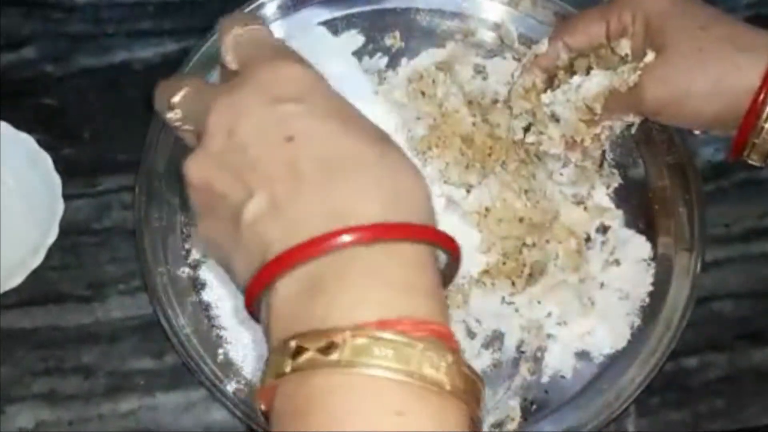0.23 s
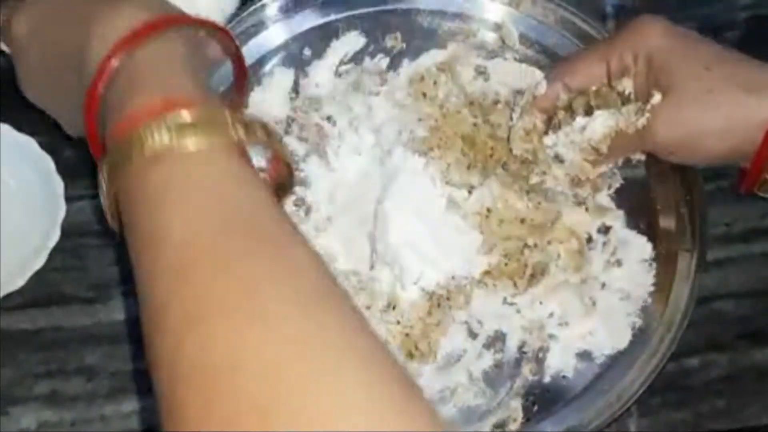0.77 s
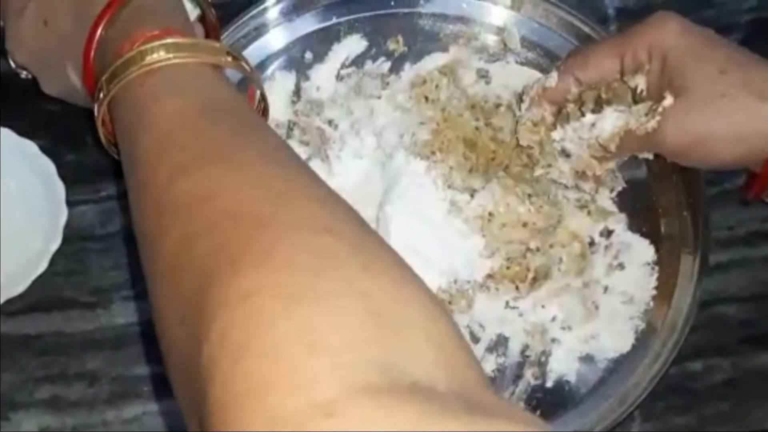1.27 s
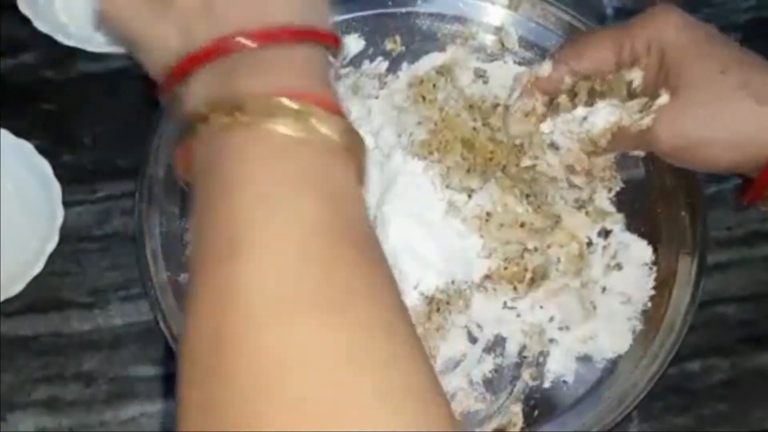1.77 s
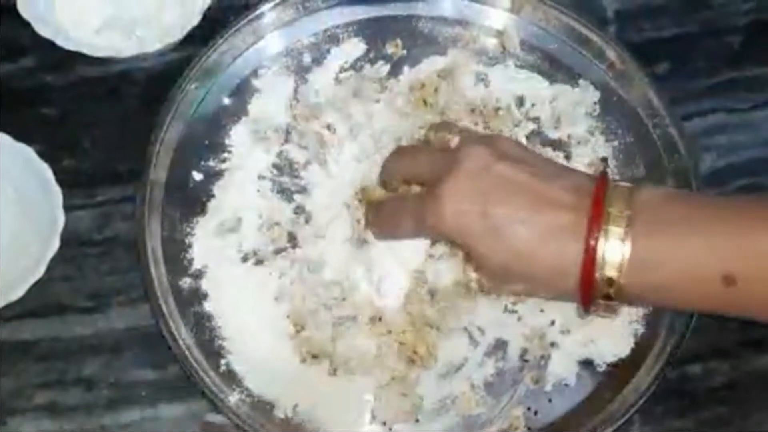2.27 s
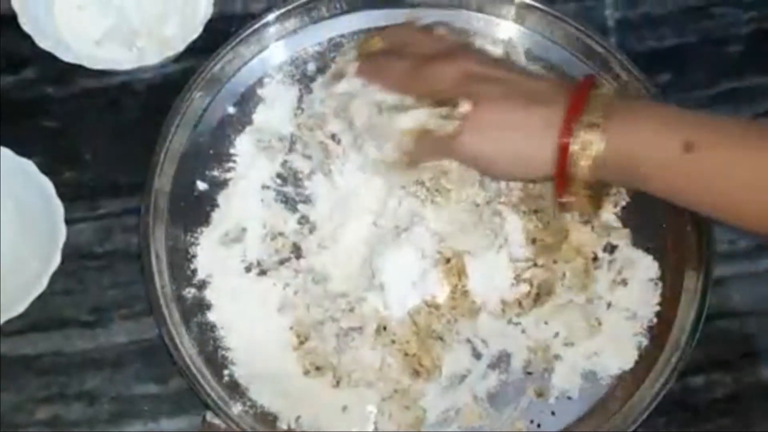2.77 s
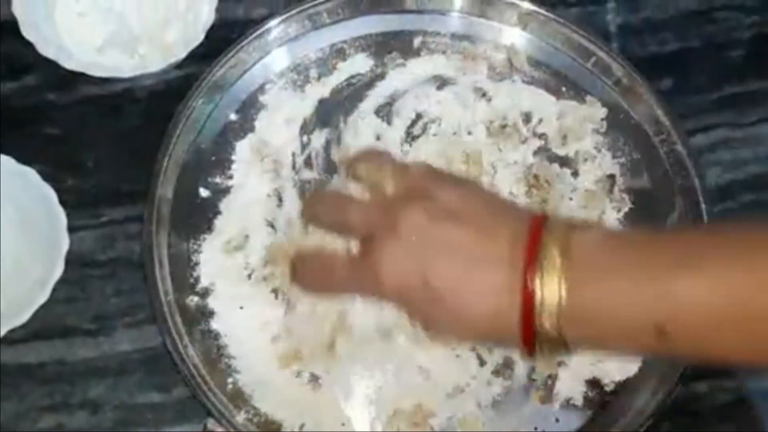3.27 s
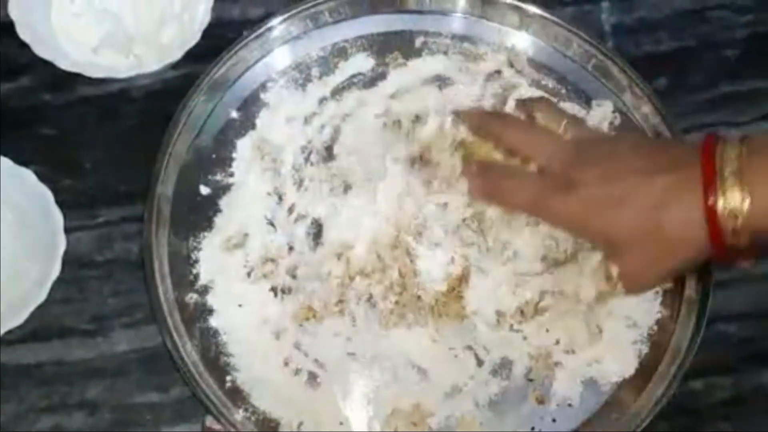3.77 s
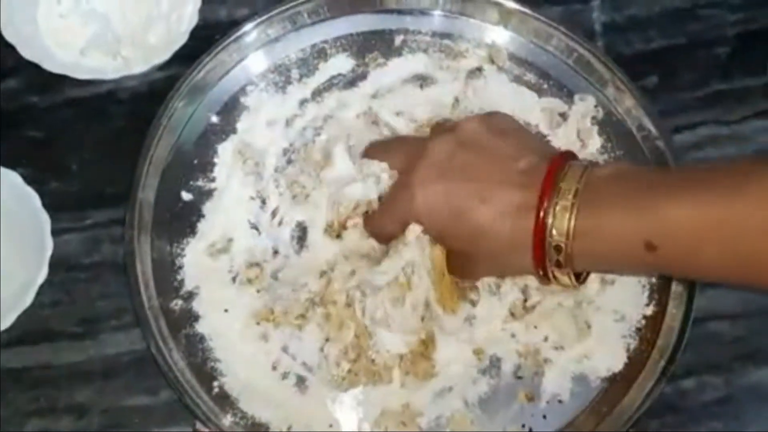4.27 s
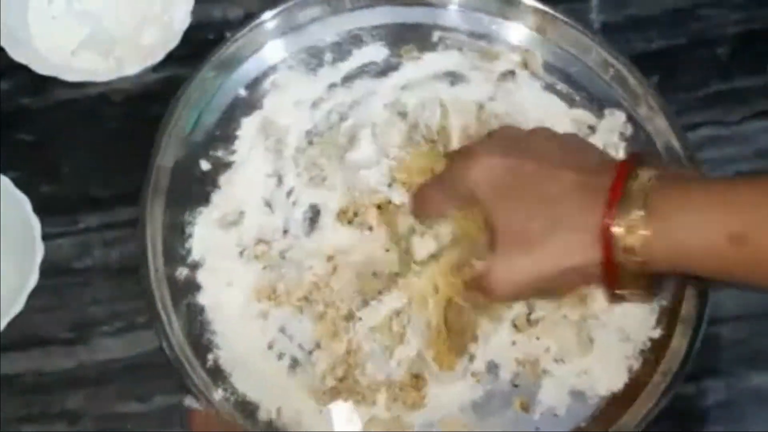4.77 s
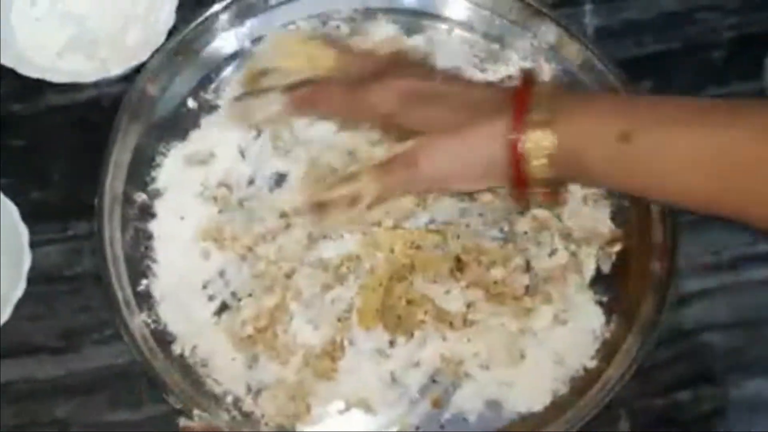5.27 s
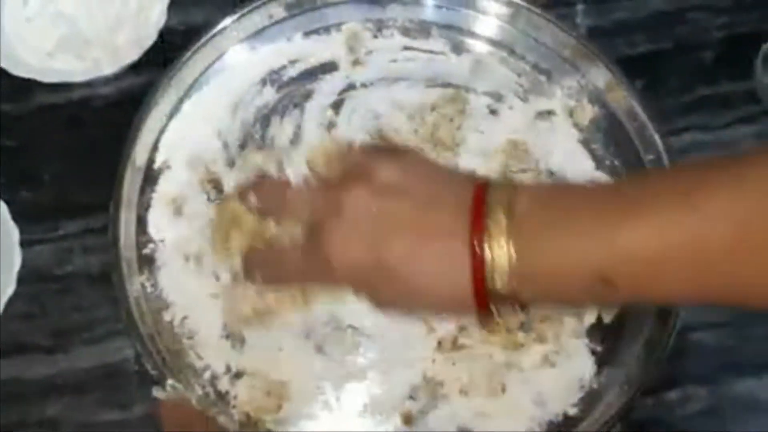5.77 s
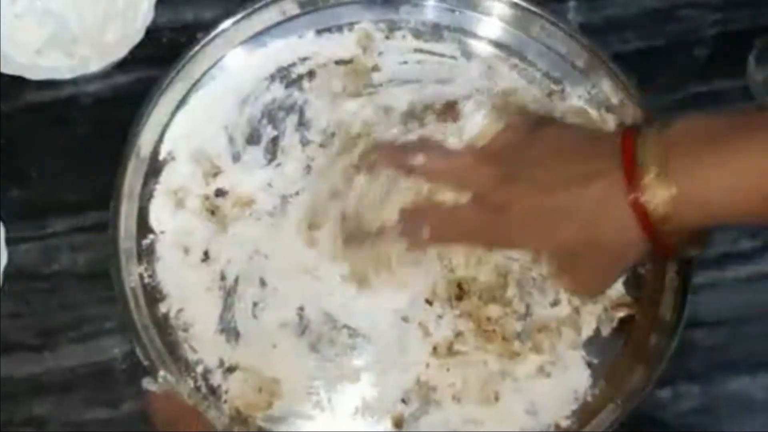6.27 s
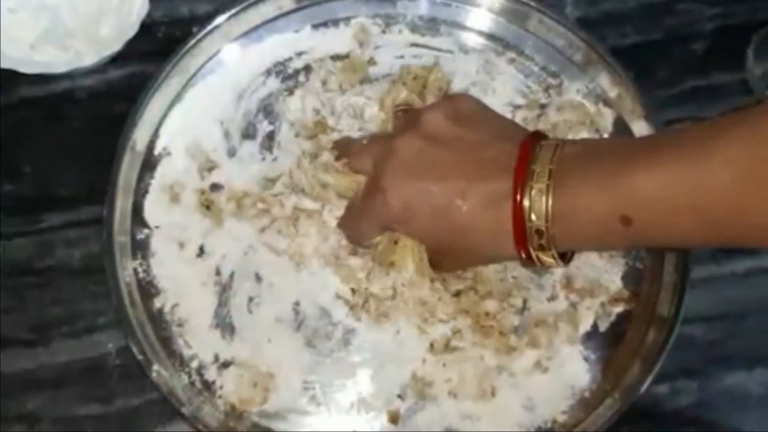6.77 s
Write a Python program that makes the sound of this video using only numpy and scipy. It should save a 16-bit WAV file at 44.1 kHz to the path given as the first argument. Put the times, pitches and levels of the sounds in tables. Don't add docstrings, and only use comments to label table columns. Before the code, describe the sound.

Recorded by a phone within an arm's length of a bowl on a stone counter. Quiet low rumble opens, two short dish knocks follow, then light bangle clinks. Dry, grainy rubbing starts softly and grows into uneven scratchy sweeps with dull steel resonance and scraping underneath. Around the middle a sharp bright clang on the bowl rim stands far above everything, with a weak rebound; rubbing continues with tiny ticks and a delicate glassy tinkle.

```python
import sys
import numpy as np
from scipy import signal
from scipy.fft import rfft, irfft
from scipy.io import wavfile
from scipy.ndimage import uniform_filter1d

SR = 44100
rng = np.random.default_rng(int(sys.argv[2]) if len(sys.argv) > 2 else 0)


def amplitude_ratio(level_db):
    exponent = np.asarray(level_db, float) / 20
    return 10 ** exponent


def to_wav(s):
    ch = np.atleast_2d(s).T
    pcm = np.round(np.clip(ch, -1, 1) * 32767)
    wavfile.write(sys.argv[1], SR, pcm.astype(np.int16))


N = 309435
LEFT_LATE = 4
FRAME = 1024
HZ = np.fft.rfftfreq(FRAME, 1 / SR)[:, None]

# f/Hz, left-right/dB
BOWL_LEAN = [(300, -1), (700, 3), (1500, -9), (2500, -7), (5000, -1), (12000, -1.5)]


def read(points, hz):
    f, value = np.transpose(points)
    return np.interp(np.log(hz + 1), np.log(f + 1), value)


def evened(x):
    return x / np.sqrt(np.mean(abs(x) ** 2) + 1e-30)


def add(mix, s, sound):
    part = mix[:, round(s * SR):][:, :sound.shape[1]]
    part += sound[:, :part.shape[1]]


def patches(shape, bins, frames):
    z = uniform_filter1d(rng.standard_normal(shape), int(bins), 0)
    return evened(uniform_filter1d(z, int(frames), 1))


def ports(a, b, hz, same, lean):
    likeness = np.clip(read(same, hz), 0, 1)
    late = np.exp(-2j * np.pi * hz * LEFT_LATE / SR)
    side = amplitude_ratio(read(lean, hz) / 2)
    right = likeness * a + np.sqrt(1 - likeness ** 2) * b
    return np.array([a * late * side, right / side])


def room_tone():
    # f/Hz, level per Hz/dB
    colour = [(25, -25), (50, -12), (80, -1), (119, 5), (150, -6.5), (195, -21), (250, -8), (340, -18),
              (450, -26.5), (850, -34), (1400, -38.5), (2100, -36), (2900, -47.5), (15500, -49.5)]
    # t/s, level/dB
    swell = [(0.0, -67), (0.4, -65), (0.72, -61.5), (1.04, -70.5), (1.55, -62), (2.05, -65), (3.75, -69.5),
             (4.2, -63.5), (4.55, -68), (4.92, -61), (5.2, -63.5), (6.0, -66.5), (6.21, -61.5), (6.76, -60),
             (7.02, -61.5)]
    # f/Hz, left-right likeness/0-1
    same = [(60, 0.94), (130, 0.94), (290, 0.86), (640, 0.1), (1410, 0), (3100, 0.3), (6820, 0.3),
            (15000, 0.08)]
    # f/Hz, left-right/dB
    lean = [(60, -2), (500, -1), (1500, -5.5), (5000, -1.5), (15000, 2.5)]
    hz = np.fft.rfftfreq(2048, 1 / SR)[:, None]
    t = np.arange(N // 512 + 5) * 512 / SR
    shape = (2, len(hz), len(t))
    a, b = rng.standard_normal(shape) + 1j * rng.standard_normal(shape)
    swell_db = np.interp(t, *np.transpose(swell))
    follow = 1 / (1 + (hz / 220) ** 2)
    level_db = follow * swell_db + (1 - follow) * -62
    level_db = level_db + 2.0 * patches(a.shape, 3, 4.6) * (hz < 900)
    gain = amplitude_ratio(read(colour, hz))
    gain = gain / np.sqrt(np.sum(gain[:10] ** 2))
    z = ports(a, b, hz, same, lean) * gain * amplitude_ratio(level_db)
    return amplitude_ratio(6.5) * signal.istft(z, nperseg=2048, noverlap=1536)[1][:, :N]


def panned(x, pan_db):
    left, right = x * np.ones((2, 1))
    return np.array([np.roll(left, LEFT_LATE) * amplitude_ratio(pan_db / 2), right * amplitude_ratio(-pan_db / 2)])


def brushes():
    # t/s, length/s, start f/Hz, end f/Hz, width/Hz, level/dB
    sweeps = [(0.416, 0.12, 12300, 4980, 3300, -77), (0.38, 0.17, 690, 660, 29, -75.5),
              (0.69, 0.096, 1336, 1320, 90, -77.5), (0.99, 0.12, 9100, 9000, 500, -86),
              (1.511, 0.05, 6600, 5630, 2100, -74.5), (1.784, 0.051, 9000, 10040, 4600, -67.5),
              (4.596, 0.12, 935, 953, 26, -61), (4.639, 0.14, 1210, 1205, 43, -55.5),
              (6.145, 0.065, 940, 956, 21, -58.5), (6.424, 0.038, 1700, 1646, 250, -51),
              (6.558, 0.13, 4022, 3960, 8, -71), (6.703, .14, 4608, 4608, 8, -75),
              (0.722, 0.089, 1630, 1630, 25, -83)]
    out = np.zeros((2, N))
    for s, length, from_hz, to_hz, width_hz, db in sweeps:
        n = int(length * SR)
        pole = np.exp(-np.pi * width_hz / SR)
        fuzz = signal.lfilter([1], [1, -pole], rng.standard_normal((2, 8000)))[:, :n]
        turn = np.exp(2j * np.pi * np.cumsum(np.geomspace(from_hz, to_hz, n)) / SR)
        band = evened(((fuzz[0] + 1j * fuzz[1]) * turn).real)
        add(out, s, panned(amplitude_ratio(db) * band * np.hanning(n), -6.5))
    return out


def coloured(x, spectrum):
    gain_db = np.maximum(read(spectrum, abs(np.fft.fftfreq(8192, 1 / SR))), -90)
    log_gain = np.log(amplitude_ratio(gain_db))
    taps = np.fft.ifft(np.exp(np.conj(signal.hilbert(log_gain)))).real[:4096]
    return signal.fftconvolve(x, taps)


def burst(ms, spectrum):
    t_ms = np.arange(3000) / SR * 1000
    z = rfft(rng.choice([-1., 1.], 2000) * np.exp(-t_ms[:2000] / ms), 4096)
    even = irfft(z / abs(z) ** 0.59)[:3000]
    x = coloured(even * np.exp(-0.3 * t_ms / ms), spectrum)
    return x / abs(x).max()


def wave(turns):
    return np.sin((2 * np.pi * turns).astype(np.float32))


def ring(modes, tilt_db, damping, longest):
    hz, db, t60 = np.transpose(modes)[:, :, None]
    t = np.arange(SR * 3 // 10) / SR
    detune, phase, shift, twin_phase, twin_shift = rng.random((len(hz), 5)).T[:, :, None]
    level_db = db + tilt_db * np.log2(hz / 4000)
    decay = amplitude_ratio(level_db - 60 * t * damping / np.clip(t60, .05, longest))
    decay = decay * (1 - np.exp(-t * hz / 2.85))
    apart = hz / (hz + 900)
    twin_hz = hz * (1 + 0.015 * (detune - .5))
    x = []
    for side in (0, .3):
        main = wave(hz * t + phase + side * apart * shift)
        twin = wave(twin_hz * t + twin_phase + side * apart * twin_shift)
        x.append((decay * (main + 0.13 * twin)).sum(0))
    return x / np.abs(x).max()


def knocks():
    # t/s, peak/dB, left-right/dB, which colour, rattle/ms, thump/dB
    contacts = [
        (1.216, -20, -3.5, 0, 13, -15),
        (1.4590, -34.5, -3, 1, 4, -5.5),
        (1.4653, -29.5, -5, 1, 0.79, -19),
        (1.4676, -29, -6, 1, 1.6, -21),
        (1.4777, -48, 0, 1, 2.9, -19),
    ]
    # f/Hz, level per Hz/dB
    colours = [
        [(120, -21.5), (350, -7.5), (750, -5), (1200, -2), (1750, 3), (2500, -3), (3300, -15), (4600, -17.5),
         (5600, -32), (8600, -47.5), (12000, -58), (15600, -80)],
        [(120, -13), (330, 6), (560, -2.5), (900, -8.5), (1150, -9), (1400, -7), (2000, -12), (2800, -29),
         (4000, -66), (9000, -68), (12000, -100)],
    ]
    # f/Hz, level/dB, t60/s
    slab = [(220.6, -16, 0.42), (268, -11, 0.27), (332, 0.5, 0.15), (413, -12, 0.16), (526.8, -1.5, 0.29),
            (634, 1, 0.14)]
    out = np.zeros((2, N))
    for s, db, pan, colour, ms, thump_db in contacts:
        add(out, s, panned(amplitude_ratio(db) * burst(ms, colours[round(colour)]), pan))
        add(out, s, panned(amplitude_ratio(db + thump_db) * ring(slab, 0, 1.5, .5), pan / 3))
    return out


def bangles():
    # t/s, peak/dB, left-right/dB, which pair, rattle/dB
    clinks = [
        (1.8157, -43, 5.5, 0, -2),
        (2.0831, -42.5, 6, 1, -5.5),
    ]
    # f/Hz, level/dB, t60/s
    pairs = [
        [(4650, -21, 0.12), (6740, -12, 0.28), (7500, -20, 0.099), (8890, -1, 0.12), (9080, -1, 0.21),
         (9800, -5, 0.15), (10500, -8, 0.13), (11340, -13, 0.12), (12760, -2, 0.078), (13500, -1, 0.11),
         (14200, -6, 0.12), (15300, -9, 0.13)],
        [(5040, -11, 0.076), (6900, -24, 0.06), (8140, -12, 0.13), (8320, -14, 0.17), (9065, -22, .1),
         (9598, -14, 0.11), (9900, -9, 0.1), (11000, -26, .1), (13280, -4, 0.087), (15540, -7, 0.11)],
    ]
    # t/s, peak/dB, left-right/dB, rattle/dB
    tinkles = [
        (6.6595, -50, -6, -5),
        (6.667, -49, -3, -9),
        (6.678, -46.5, 1, -1),
        (6.691, -46, -1.5, -5),
    ]
    # f/Hz, level/dB, t60/s
    tinkle_rings = [
        [(4608, -4.5, .5), (6230, -3, 0.29), (7628, -8, .4), (12220, -4, .15)],
        [(11200, 1, .15), (12220, -3, .2), (14050, -6.5, .3), (15180, -6, .2)],
        [(5184, -2, .4), (5700, -4, 0.28), (7612, -2, 0.23), (8387, 0, 0.25), (12750, -6, 0.18),
         (14450, -7, .15)],
        [(6729, -8, 0.25), (8800, 0.5, 0.073), (10600, -7, .2), (11780, -2, .2), (13080, -3, .25)],
    ]
    rattle = [(3500, -12), (5000, 2.5), (9000, 6), (15000, -3.0)]  # f/Hz, level/dB
    touches = [(s, db, pan, rattle_db, pairs[round(pair)]) for s, db, pan, pair, rattle_db in clinks]
    touches += [(*row, modes) for row, modes in zip(tinkles, tinkle_rings)]
    out = np.zeros((2, N))
    for s, db, pan, rattle_db, modes in touches:
        add(out, s, panned(amplitude_ratio(db + 2.5) * ring(modes, 0, 3, 0.4), pan))
        add(out, s, panned(amplitude_ratio(db + rattle_db) * burst(9.1, rattle), pan))
    return out


def resonances(modes):
    return evened(sum(amplitude_ratio(db) / (1 + ((HZ - hz) / width) ** 4) for hz, width, db in modes))


def gestures(t, rows, lift_db):
    s, hold, db, drift_db = np.transpose(rows)[:4, :, None]
    hold = np.maximum(hold, 1 / 500)
    level_db = db + lift_db + drift_db * np.clip((t - s) / hold, 0, 1)
    level_db = level_db - 256.5 * np.maximum(s - t, 0)
    level_db = level_db - 228 * np.maximum(t - s - hold, 0)
    return 10 * np.log10((amplitude_ratio(level_db) ** 2).sum(0) + 1e-12)


def rubbing():
    # t/s, hold/s, hiss level/dB, drift over the hold/dB, weight on the steel/dB
    strokes = [(1.927, 0.17, -88.5, 12.5, -5), (2.125, 0.19, -75, 5, -4.5), (2.293, 0.21, -66.5, -10, -1),
               (2.56, 0.15, -73.5, -10, -3), (2.791, 0.099, -63, 9.5, 0), (2.959, 0.045, -55.5, 1.5, 1.5),
               (3.075, 0.036, -68.5, 3, -1.5), (3.225, 0.091, -51.5, -3, -1),
               (3.398, 0.052, -56.5, -8, -1.5), (3.474, 0.36, -69.5, 5, 0), (3.891, 0.17, -60.5, -1, 2.5),
               (4.117, 0.44, -62, -11.5, 1), (4.638, 0.098, -58.5, 7.5, 1.5), (4.79, 0.23, -50.5, 0, -2.5),
               (5.03, 0.35, -60, 3, 0), (5.395, 0.12, -53, 3, 2), (5.701, 0.14, -52.5, -6.5, -1.5),
               (5.898, 0.091, -63.5, -2, -3), (6.02, 0.35, -56, -14.5, 1), (6.317, 0.15, -64, 5.5, 5.5),
               (6.512, 0.1, -64.5, -2.5, -0.5), (6.674, 0.029, -58.5, -1.5, -10.5),
               (6.746, 0.246, -65.5, 1.5, -4)]
    # t/s, hold/s, level/dB, drift/dB
    presses = [(2.312, 0.12, -78, -4), (2.846, 0.039, -74, -5), (2.997, 0.026, -75.5, 11),
               (3.228, 0.29, -65.5, -15), (3.775, .08, -66.5, -12), (3.98, 0.18, -65.5, -10),
               (4.641, 0.098, -67.5, 20), (4.79, 0.21, -63, 11), (5.18, 0.084, -57.5, -13),
               (5.404, 0.17, -52, -8.5), (5.711, 0.25, -70, -7), (5.916, 0.18, -68, -8),
               (6.189, 0.049, -62.5, -1.5), (6.325, 0.18, -68, 5.5), (6.586, 0.25, -75.5, -5.5)]
    # t/s, hold/s, level/dB, drift/dB
    slides = [(2.302, 0.49, -82, 3), (2.895, 0.13, -66, -5), (3.232, 0.59, -69, -12), (3.77, 0.025, -73, 0),
              (3.95, 0.18, -67, 2), (4.202, 0.52, -75, -8), (4.712, 0.18, -56, 2), (5.185, 0.11, -62.5, -3),
              (5.492, 0.054, -65.5, 2.5), (5.696, 0.18, -66, -32), (6.117, 0.37, -67.5, 15.5),
              (6.59, 0.36, -63.5, -13.5)]
    # f/Hz, level per Hz/dB
    flour = [(3300, -20.5), (5600, -5), (6500, -1.5), (7400, -3.5), (8300, 0.5), (9300, -6), (11000, -2.5),
             (12800, -1.5), (14500, -5)]
    # f/Hz, width/Hz, level/dB
    paste = [(3590, 1660, 2.5), (4920, 800, -15.5), (5300, 4000, -1.5)]
    # f/Hz, width/Hz, level/dB
    wall = [(1186, 260, 0), (1630, 182, 1.5), (1870, 120, -3), (2487, 196, 2.5)]
    # f/Hz, width/Hz, level/dB
    hump = [(2074, 190, -3.5), (2660, 440, -12.5)]
    # f/Hz, width/Hz, level/dB
    bottom = [(963, 55, 6), (1044, 390, 0.5)]
    # f/Hz, width/Hz, level/dB
    dent = [(719, 57, 0), (835, 22, 12.5)]
    # f/Hz, width/Hz, level/dB
    drag = [(258, 16, 0.5), (315, 24.4, 10.5), (386, 240, -3.5)]
    # f/Hz, left-right likeness/0-1
    same = [(60, 0.8), (130, 0.3), (290, 0.86), (640, 0.5), (1410, 0.66), (3100, 0), (6820, 0.07),
            (15000, 0)]
    slips = (rng.random((2, N)) < 9000 / SR) * rng.standard_normal((2, N))
    slips = evened(slips * amplitude_ratio(2.6 * np.minimum(rng.exponential(1, (2, N)), 5)))
    drive = evened(.6 * slips + .7 * rng.standard_normal((2, N)))
    a, b = signal.stft(drive, nperseg=FRAME, noverlap=FRAME * 3 // 4)[2]
    t = np.arange(a.shape[1]) * FRAME / 4 / SR
    weight_db = np.transpose(strokes)[-1][:, None]
    hiss_db = gestures(t, strokes, 0)
    wall_db = gestures(t, strokes, weight_db)
    press_db = gestures(t, presses, 0)
    paste_db = gestures(t, strokes, -10.5 + 0.78 * weight_db) + 0.37 * (hiss_db + 66.5)
    parts = [(evened(amplitude_ratio(read(flour, HZ))), hiss_db),
             (resonances(paste), paste_db),
             (resonances(wall), wall_db - 3.5 + 0.23 * (wall_db + 55.5)),
             (resonances(hump), wall_db - 5.0 - 0.039 * (wall_db + 66.5)),
             (resonances(bottom), press_db),
             (resonances(dent), press_db + 0.61 * (press_db + 52.5)),
             (resonances(drag), gestures(t, slides, 0))]
    power = sum((form * amplitude_ratio(db)) ** 2 for form, db in parts)
    lumps_db = 1.3 * patches((1, len(t)), 1, 2.6)
    wander_db = 3.4 * patches(a.shape, 2.6, 9.7) / (1 + HZ / 5000)
    z = ports(a, b, HZ, same, BOWL_LEAN) * np.sqrt(power) * amplitude_ratio(lumps_db + wander_db)
    return signal.istft(z, nperseg=FRAME, noverlap=FRAME * 3 // 4)[1][:, :N]


def ticks():
    # t/s, peak/dB, centre f/Hz, left-right/dB
    specks = [(2.182, -60, 9500, -1), (2.2235, -63, 11000, 1.5), (2.6566, -62, 11300, -8),
              (4.527, -52, 6400, -5), (4.79, -47, 11400, -3), (4.8938, -42, 8200, -1.5),
              (5.2522, -53, 12000, -1.5), (5.2867, -43, 7840, -4), (5.6655, -57.5, 12400, -1.5),
              (5.9554, -51, 8130, 0.5), (6.2976, -54, 8290, -1.5), (6.6168, -54.5, 11200, -1.5),
              (6.868, -53, 12000, -1.5), (6.9217, -51, 7300, 0), (6.9426, -51, 13500, 0),
              (6.991, -43, 7540, 11), (6.9933, -45, 14500, 0.5), (7.0024, -55, 7000, -8),
              (5.1811, -42.5, 1340, -7), (6.923, -59, 1990, -9), (6.993, -50, 2080, -9)]
    # share of the centre f, level/dB
    tick_colour = [(.33, -30), (.7, -6), (1, 0), (1.5, -8), (4, -40)]
    out = np.zeros((2, N))
    for s, db, hz, pan in specks:
        add(out, s, panned(amplitude_ratio(db + 4) * burst(1.0, np.multiply(tick_colour, [hz, 1])), pan))
    return out


def leaned(x):
    hz = np.fft.rfftfreq(x.shape[-1], 1 / SR)
    lean = amplitude_ratio(read(BOWL_LEAN, hz) * 0.47)
    late = np.exp(-1j * np.pi * hz * LEFT_LATE / SR)
    return irfft(rfft(x) * np.array([lean * late, 1 / lean]), x.shape[-1])


def shell():
    place, size, life = rng.random((56, 3)).T
    hz = 2950 + 12000 * (np.arange(56) + place) / 56
    t60 = .3 * (0.36 + 1.24 * life) * (4000 / (hz + 1500)) ** 0.52
    x = amplitude_ratio(-17) * ring(np.column_stack([hz, -11.5 * size, t60]), -3.5, 0.89, 1)
    snap = burst(1.6, [(600, -25), (2500, -14), (7000, -1), (11300, 10.0), (15500, -5)])
    add(x, 0, amplitude_ratio(-8) * snap[None])
    return leaned(x)


def rim_blows():
    # t/s, peak/dB, tilt per octave/dB, damping by the hand, crack/dB
    hits = [
        (4.9324, -8, 0.84, 2.62, -0.5),
        (4.986, -28, -4.5, 3.4, 10.5),
    ]
    rim_hz = [324, 802, 854, 1259, 1384, 1421, 1755, 1794, 1910, 2326, 2352, 2878, 3322, 3453, 4022, 4608,
              5155, 5728, 5911, 6234, 6296, 6697, 6762, 7176, 7564, 8030, 11350, 12840, 13950]
    # level/dB, t60/s
    rim_levels = [(-9, 0.73), (3.5, 0.22), (-18, 0.14), (-2, 0.18), (-12.5, 0.11), (1.5, 0.079), (-6, 0.34),
                  (-23.5, 0.4), (-11, 0.1), (-6, 0.4), (3.5, 0.26), (-13.5, 1), (-2, 0.21), (-6, 0.55),
                  (-3.5, 0.61), (-19, 0.47), (1.5, 0.11), (-11, 0.24), (-15, 0.3), (-4, 0.35), (-21, 0.16),
                  (-19.5, 0.091), (-0.5, 0.3), (-15.5, 0.74), (-13.5, 0.16), (-16.5, 0.52), (4, 0.028),
                  (-7.5, 0.12), (-26, .15)]
    # f/Hz, level per Hz/dB
    crack = [(120, -27.5), (330, -10.5), (600, -9.5), (800, -4), (1050, -7.5), (1400, -3.5), (2340, -3),
             (2900, -21.5), (4400, -24.5), (5200, -15), (7000, -5.5), (9500, -18), (11300, -30),
             (15000, -17.5)]
    # f/Hz, level/dB, t60/s
    striker = [(4657, -1, .14), (5580, -13, .14), (7800, -3, .17), (8390, -18, 0.23), (8500, -10, .25),
               (9800, 1, .15), (10440, -18, .18), (9700, 3, .12), (10700, -10, .12), (10740, -12, .15),
               (12200, -2, .14), (11300, -3, .12), (13100, -17, .14), (14000, -17.5, 0.22),
               (14740, -12.5, .08), (15430, -8, .08)]
    rim_modes = np.column_stack([rim_hz, rim_levels])
    out = np.zeros((2, N))
    for s, db, tilt_db, damping, crack_db in hits:
        add(out, s, leaned(amplitude_ratio(db) * ring(rim_modes, tilt_db, damping, 0.96)))
        tilted = [(hz, level + tilt_db * np.log2(hz / 8000)) for hz, level in crack]
        add(out, s, leaned(amplitude_ratio(db + crack_db) * burst(13.8, tilted)))
    add(out, hits[0][0], leaned(amplitude_ratio(-15) * ring(striker, 0, 2.2, .5)))
    add(out, hits[0][0], shell())
    return out


def kitchen(stretch):
    # f/Hz, t60/s
    decay = [(200, 0.42), (530, 0.43), (1400, 0.35), (3700, 0.36), (7000, 0.3), (14000, 0.18)]
    taps = np.zeros((2, SR))
    at = np.arange(160, SR - 20, 20) + rng.integers(0, 20, (2, (SR - 161) // 20))
    np.put_along_axis(taps, at, rng.choice([-1., 1.], at.shape), 1)
    hz, t, z = signal.stft(taps, SR, nperseg=256)
    same = 1 / (1 + (hz[:, None] / 900) ** 2) * 1.1 + 0.14
    z[1] = same * z[0] + np.sqrt(1 - np.minimum(same, 1) ** 2) * z[1]
    t60 = stretch * read(decay, hz)[:, None]
    tail = signal.istft(z * amplitude_ratio(-60 * t / t60), SR, nperseg=256)[1]
    return tail / np.linalg.norm(tail[0])


def scene():
    hum, dish, rub, specks = room_tone(), knocks(), rubbing(), ticks()
    steel = bangles() + rim_blows()
    echo = signal.fftconvolve(amplitude_ratio(-1.4) * dish, kitchen(1.07), axes=1)
    at_bowl = amplitude_ratio(-3.5) * steel + amplitude_ratio(-7) * specks + amplitude_ratio(-11) * rub
    echo = echo + signal.fftconvolve(at_bowl, kitchen(0.97), axes=1)
    return dish + steel + specks + rub + brushes() + echo[:, :N] + hum


def band_limit(x):
    return signal.sosfilt(signal.butter(12, 16800, fs=SR, output="sos"), x)


def record(dry):
    edge = signal.firwin(511, 15900, window=("kaiser", 9), fs=SR)
    mix = signal.oaconvolve(dry, edge[None], "same")
    return band_limit(mix)


dry = scene()
out = record(dry)
to_wav(out)
```